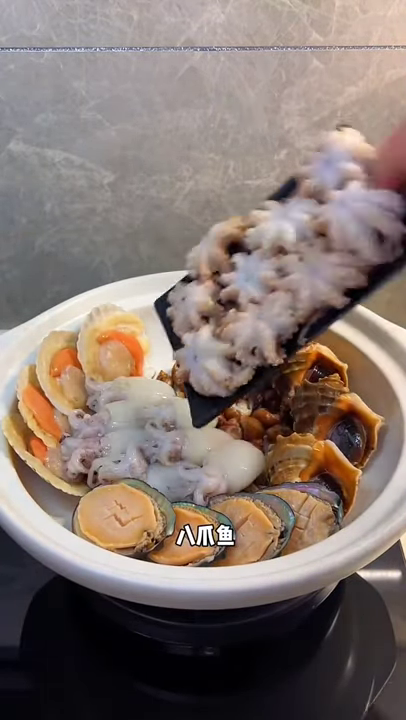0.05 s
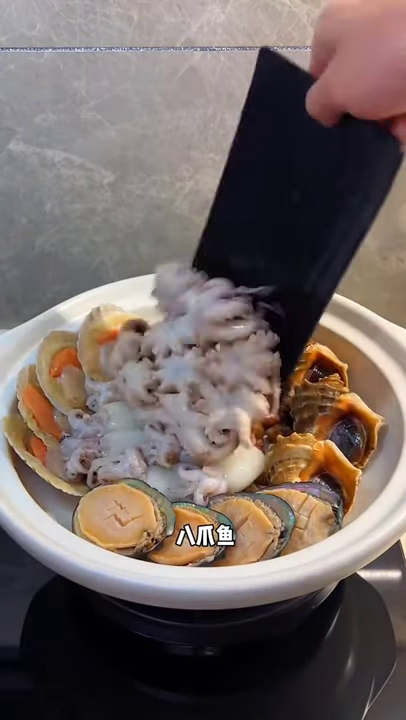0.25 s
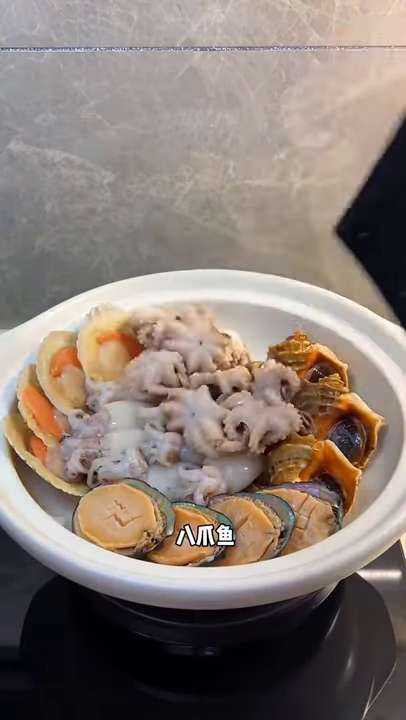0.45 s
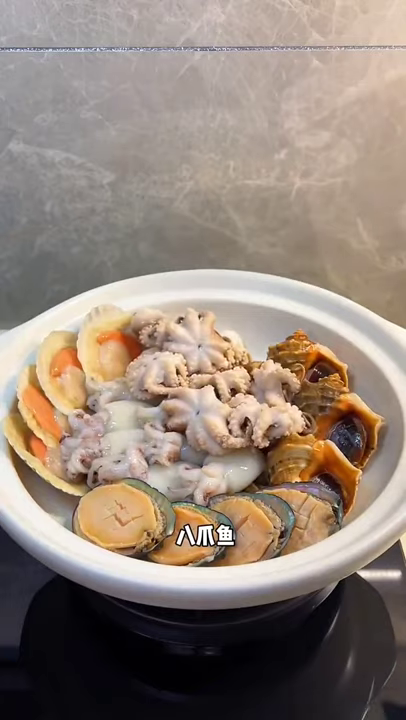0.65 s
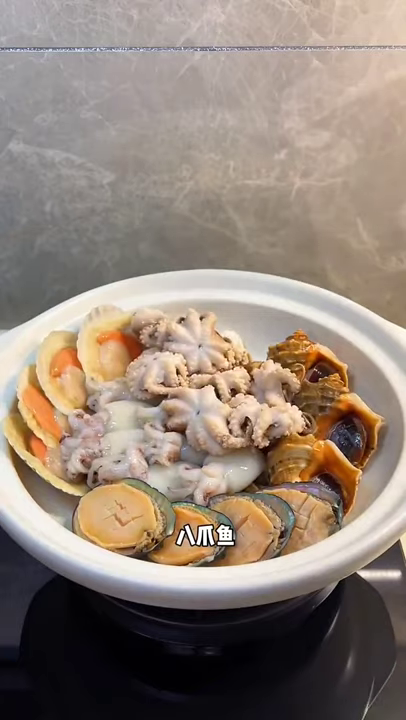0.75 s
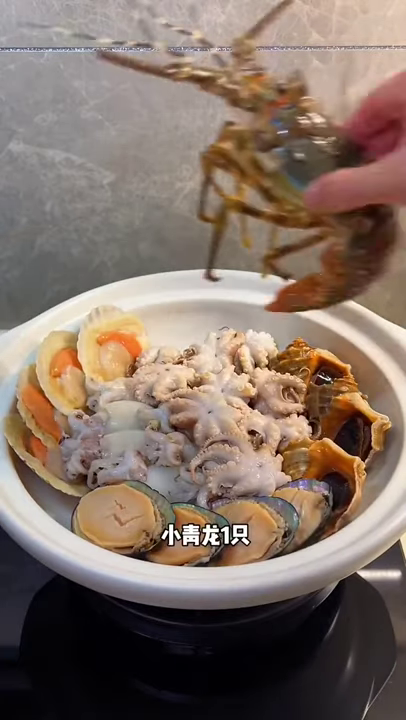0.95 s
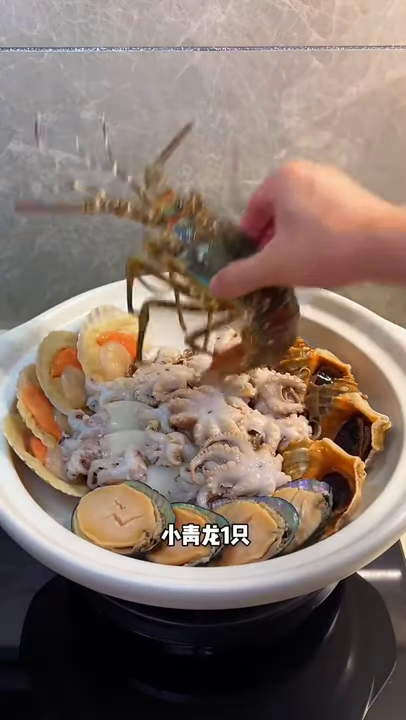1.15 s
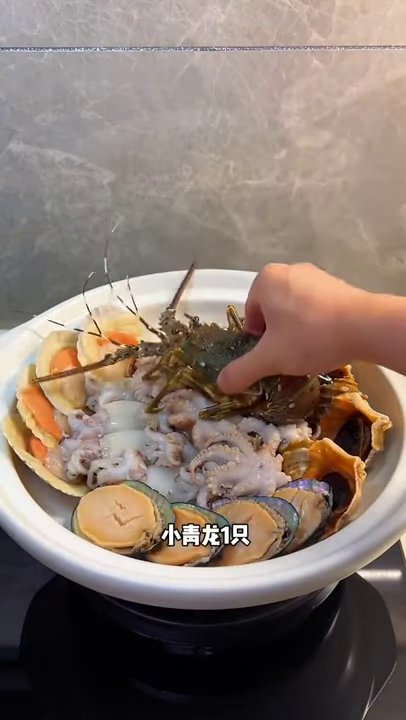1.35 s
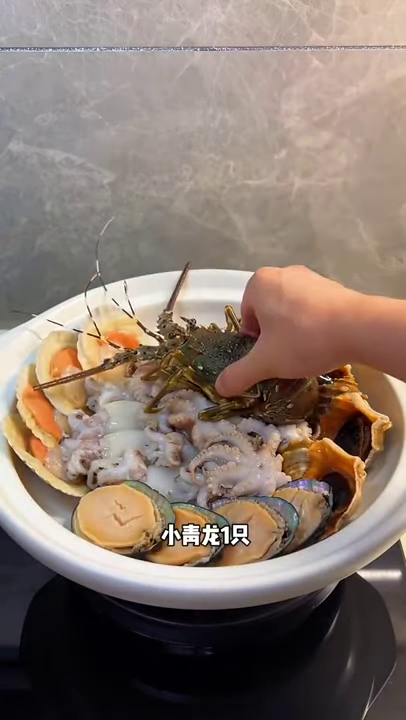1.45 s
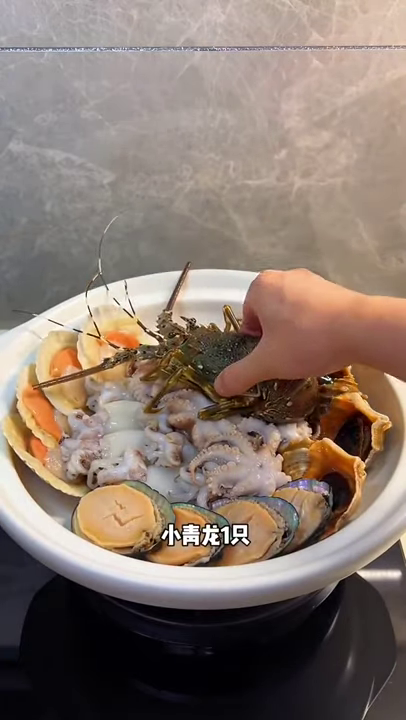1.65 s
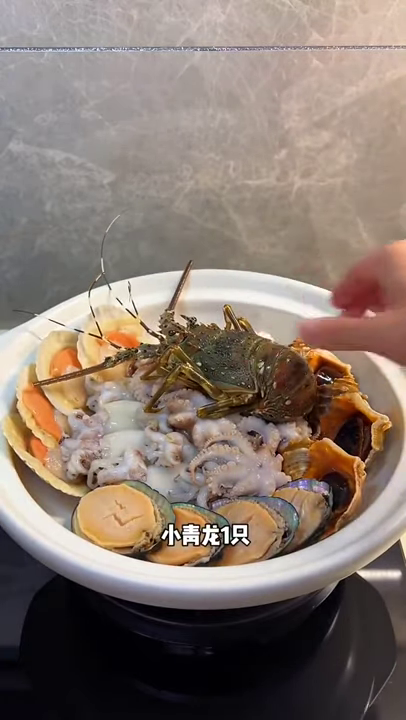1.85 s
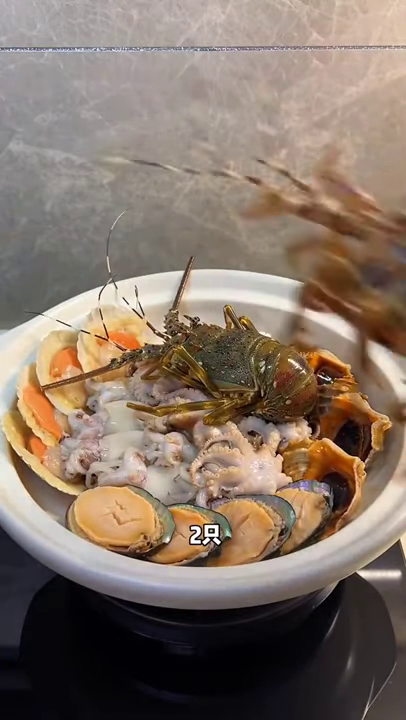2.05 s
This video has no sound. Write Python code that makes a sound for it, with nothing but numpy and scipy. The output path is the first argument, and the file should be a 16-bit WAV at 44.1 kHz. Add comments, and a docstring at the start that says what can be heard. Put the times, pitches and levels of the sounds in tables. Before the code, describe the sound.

Seafood clatters into a ceramic pot in a small kitchen. Octopus slithers in wetly from the start, while a plastic tray rattles on shells around 0.3 seconds and clips the rim with a sharp, brief ring just after. Following a pause, a lobster lands at 1.3 seconds with a crunchy thud, clinking a shell against the pot, then settles softly near 1.7 seconds. Faint hiss and low hum lie underneath.

```python
"""A wet slither comes first: octopus slides into a ceramic pot in a small, hard-walled kitchen. Its
plastic tray rattles on the shells and clips the rim; then a lobster is set down with a crunchy thud,
knocks a shell against the pot and settles. Impacts give bursts of contact noise and excite the damped
normal modes of pot, tray and hollow. Automatic gain control ducks the room's hiss after each loud hit."""
import sys
import numpy as np
from scipy import signal
from scipy.fft import rfft, irfft, next_fast_len
from scipy.io import wavfile
from scipy.ndimage import uniform_filter1d, minimum_filter1d, map_coordinates

SR = 44100
rng = np.random.default_rng(int(sys.argv[2]) if len(sys.argv) > 2 else 0)


def dump(signal):
    """Clip the signal to [-1, 1] and save it as 16-bit WAV at the path in sys.argv[1]."""
    limited = np.clip(np.atleast_2d(signal).T, -1, 1)
    pcm = np.round(limited * 32767).astype(np.int16)
    wavfile.write(sys.argv[1], SR, pcm)


N = 92610
T = np.arange(N) / SR
AGE = T[:SR * 3 // 4]  # time since an impact, t/s
CRACK_T60, RING_ROOM_DB = 0.035, -13.5  # shared by pot and tray


# Modes of the pot's wall: f/Hz, T60/s, level/dB struck on the rim, level/dB struck inside, beat f/Hz
POT_MODES = [(1031, 0.063, -2.5, -7, -4), (1294, 0.069, 0.5, -14, 0), (1410, 0.11, 0.5, -0.5, -17),
             (2505, 0.25, 2.5, -7.5, 10.5), (2607, 0.24, -8, 0, -16.5), (3344, 0.31, -8.5, -44, -5),
             (3970, 0.22, -13, -43, 0), (3882, .3, -7, -6, 8), (4048, 0.25, -5, -6.5, 8.5),
             (4890, 0.062, -28, -1.5, 0), (5022, 0.86, -31.5, -27, 0), (5443, 0.14, -33, -5, -3),
             (5490, 0.36, -36, -27, 5)]
# Spectrum of a hard contact: f/Hz, relative level/dB
CRACK_SPECTRUM = [(40, -35), (150, -8.5), (350, -11.5), (800, -11.5), (1350, 1.5), (2100, -8), (3700, -3),
                  (5000, -10), (8000, -18.5), (9200, -23.5), (10500, -23.5), (16000, -45)]
# Hits on the pot: t/s, ring level/dB, crack level/dB, place (0 rim, 1 inside), crack's reverb gain/dB
POT_HITS = [(.052, -48, -63, 0.27, -3), (0.3599, -1, 0.5, 0, 0), (1.304, -20, -37, 0.86, -6),
            (1.3277, -5, -3.5, 0.85, -7.5)]

def pot(rock_at_s=1.51, rock_db=-35):
    """Modal vibration: the place struck weights the ceramic's modes, and close twin modes beat."""
    out = np.zeros(N)
    for s, ring_db, crack_db, place, room_db in POT_HITS:
        modes = [(hz, rim + place * (wall - rim), t60, beat) for hz, t60, rim, wall, beat in POT_MODES]
        add(out, s, in_kitchen(amp(ring_db) * ring(modes), RING_ROOM_DB))
        add(out, s, in_kitchen(amp(crack_db) * burst(CRACK_SPECTRUM, CRACK_T60), room_db))
    # a shell rocks softly against the wall, favouring the modes near 1400 Hz
    muted = [(hz, wall - 6 * abs(np.log2(hz / 1400)), t60 * 0.78, beat)
             for hz, t60, _, wall, beat in POT_MODES]
    add(out, rock_at_s, amp(rock_db) * ring(muted))
    return out


# Modes of the plastic tray: f/Hz, level/dB at full force, T60/s
TRAY_MODES = [(1220, -25, 0.04), (1291, -2, .1), (1444, -0.5, 0.053), (1560, -1, 0.035),
              (2058, -12.5, 0.11), (2148, -5.5, 0.093), (3313, -9, 0.044), (3650, -6, 0.056),
              (5640, -3.5, 0.039), (5900, -13, 0.13), (7480, -13, 0.076)]
# Knocks on the shells: t/s, ring level/dB, crack level/dB
TRAY_KNOCKS = [(0.199, -29.5, -28.5), (0.206, -26.5, -33), (0.225, -18, -24), (.2548, -16, -40),
               (0.2752, -1.5, -7), (.279, -6, -1.5), (.283, -13.5, -5)]
# Spectrum of the tray's edge on the rim: f/Hz, relative level/dB
CHATTER_SPECTRUM = [(100, -41), (180, -2), (300, -34.5), (450, -11), (560, 1), (750, -23), (1300, -30),
                    (2150, -19), (2520, -1), (3050, -10.5), (3500, -7), (4050, 0), (4450, -2.5),
                    (5000, -32), (8500, -28.5), (15000, -36)]

def tray(chatter_at_s=0.36, rise_s=0.017, chatter_t60=0.27, chatter_db=-3, slips_per_s=1800):
    """Impact excitation: harder knocks ring brighter; then stick-slip chatters along the rim."""
    out = np.zeros(N)
    for s, ring_db, crack_db in TRAY_KNOCKS:
        db_per_octave = 0.28 * ring_db
        modes = [(hz, db + db_per_octave * np.log2(hz / TRAY_MODES[0][0]), t60, 0)
                 for hz, db, t60 in TRAY_MODES]
        add(out, s, in_kitchen(amp(ring_db) * ring(modes), RING_ROOM_DB))
        add(out, s, in_kitchen(amp(crack_db) * burst(CRACK_SPECTRUM, CRACK_T60), room_db=-5.5))
    swell = (1 - np.exp(-AGE / rise_s)) * amp(chatter_db - 60 * AGE / chatter_t60)
    add(out, chatter_at_s, grains(len(AGE), slips_per_s, CHATTER_SPECTRUM) * swell)
    return out


# Modes of the loaded pot's hollow: f/Hz, level/dB, T60/s
HOLLOW_MODES = [(448, -12, 0.132), (544, -12, 0.22), (623.3, -10.5, .22), (778.6, -12, 0.13)]
# Spectrum of a soft contact: f/Hz, relative level/dB
THUD_SPECTRUM = [(25, -47), (65, -10), (200, -12.5), (450, 0.5), (780, 4), (1100, -1.5), (2000, -7),
                 (3200, -7), (4800, -24), (15000, -39)]
# Soft, heavy landings: t/s, level/dB
LANDINGS = [(.276, -11.5), (.351, -23.5), (.36, -18), (.427, -21.5), (1.269, -25), (1.2845, -6.5),
            (1.297, -5), (1.3075, -14.5), (1.668, -43), (1.692, -37.5), (1.711, -28), (1.721, -32),
            (1.743, -38)]

def landings(push_at_s=1.285, push_s=0.079, push_hz=58, push_db=-30):
    """Cavity resonance: soft thuds ring the pot's hollow; the lobster's weight also rocks the counter."""
    out = np.zeros(N)
    hollow = [(hz, db, t60, 0) for hz, db, t60 in HOLLOW_MODES]
    for s, db in LANDINGS:
        thud = burst(THUD_SPECTRUM, t60=0.059) + ring(hollow)
        add(out, s, in_kitchen(amp(db) * thud, room_db=-10.5))
    push = amp(push_db) * arch(AGE / push_s)
    add(out, push_at_s, push * np.sin(2 * np.pi * push_hz * AGE))
    return out


# Legs and shells touching: t/s, level/dB
SHELL_TICKS = [(0.155, -37), (.211, -24.5), (1.2259, -26), (1.229, -28.5), (1.277, -26), (1.306, -16.5),
               (1.315, -34), (1.665, -40)]
# Shells scraping: start t/s, duration/s, level/dB
SHELL_SCRAPES = [(0.347, 0.039, -18), (1.285, 0.067, -25.5), (1.674, 0.11, -52.5)]
# Spectra of a tick and of a scrape: f/Hz, relative level/dB
TICK_SPECTRUM = [(100, -15), (500, -10.5), (1500, -14), (2400, -2.5), (3200, -1.5), (4200, -9.5),
                 (5300, -7), (7500, -15), (11000, -26.5), (16000, -28)]
SCRAPE_SPECTRUM = [(300, -27), (1200, 6), (3000, 5), (5400, -3), (7500, -3), (10500, -2), (13000, -14),
                   (16000, -18)]

def shells(grains_per_s=3000):
    """Damped impact and friction: legs and shells tick without ringing and scrape grittily."""
    ticks = np.zeros(N)
    for s, db in SHELL_TICKS:
        add(ticks, s, in_kitchen(amp(db) * burst(TICK_SPECTRUM, t60=0.053), room_db=1.5))
    strokes = sum(amp(db) * arch((T - s) / length) for s, length, db in SHELL_SCRAPES)
    return ticks + strokes * grains(N, grains_per_s, SCRAPE_SPECTRUM)


# Spectrum of wet smacks: f/Hz, relative level/dB
SMACK_SPECTRUM = [(80, -11), (500, -2), (900, 2.5), (1500, -20), (2200, 0), (3200, 0), (5500, -14),
                  (8000, -21), (15000, -22)]
# Envelope of the slide off the tray: t/s, level/dB
SLIDE_ENVELOPE = [(0, -57.5), (.08, -46.5), (.14, -46), (.19, -38.5), (.27, -31.5), (.34, -36), (.4, -36),
                  (.45, -75)]

def octopus(smacks_per_s=2500, pops_per_s=350, pop_hz=2800, log_spread=0.64, decay_cycles=9, pop_db=-1):
    """Bubble resonance: each pop is a damped sine, among the tiny wet smacks of sliding flesh."""
    smacks = grains(N, smacks_per_s, SMACK_SPECTRUM)
    pops, age = np.zeros(N), AGE[:SR // 50]
    for when, pitch, size in rng.random((int(pops_per_s * N / SR), 3)):
        hz = pop_hz * np.exp(log_spread * (2 * pitch - 1))
        bubble = np.sin(2 * np.pi * hz * age) * np.exp(-hz * age / decay_cycles)
        add(pops, when * N / SR, size ** 2 * bubble)
    return (smacks + amp(pop_db) * unit(pops)) * envelope(SLIDE_ENVELOPE)


# Reverberation time of the kitchen: f/Hz, T60/s
KITCHEN_T60 = [(100, 0.38), (500, 0.26), (1500, 0.31), (4000, 0.27), (8000, 0.29), (15000, 0.05)]

def in_kitchen(sound, room_db, wall_delay_s=0.001, build_s=0.002):
    """Reverberation: a diffuse tail follows the direct sound, its highest treble dying first."""
    hz, t, noise = signal.stft(rng.standard_normal(len(AGE)), SR, nperseg=256)
    decay = amp(-60 * t / along(KITCHEN_T60, hz)[:, None])
    tail = signal.istft(noise * decay, SR, nperseg=256)[1][:len(AGE)]
    tail *= np.clip((AGE - wall_delay_s) / build_s, 0, 1)
    return sound + amp(room_db) * signal.fftconvolve(sound, tail / np.linalg.norm(tail))[:len(sound)]


# Envelope of the hum: t/s, level/dB
HUM_ENVELOPE = [(0, -49.5), (.2, -55), (.42, -44.5), (.63, -49.5), (.7, -59), (1.25, -60), (1.39, -45.5),
                (1.55, -54), (2.1, -74)]
# Spectrum of the hiss: f/Hz, relative level/dB
HISS_SPECTRUM = [(20, 1), (45, -84.5), (70, -5.5), (100, -8.5), (190, -3), (320, -2.5), (600, -6.5),
                 (1200, -11.5), (3000, -12.5), (8000, -16.5), (16000, -24)]

def room_tone(hum_hz=65.7, drift_cycles=0.1, hiss_db=-44):
    """Ambient noise: steady hiss, and a low hum that wavers by random phase modulation."""
    wander = map_coordinates(rng.standard_normal(40), [T * 12], mode="mirror")
    hum = unit(np.sin(2 * np.pi * (hum_hz * T + drift_cycles * wander)))
    hiss = unit(coloured(rng.standard_normal(N), HISS_SPECTRUM))
    return amp(hiss_db) * hiss + hum * envelope(HUM_ENVELOPE)


def ring(modes):
    """Superposition of damped sines from rows of f/Hz, level/dB, T60/s, beat f/Hz."""
    return sum(amp(db - 60 * AGE / t60) * np.cos(np.pi * beat * AGE)
               * np.sin(2 * np.pi * (hz * AGE + rng.random())) for hz, db, t60, beat in modes)


def burst(spectrum, t60):
    """Contact noise with exponential decay."""
    return coloured(rng.standard_normal(len(AGE)) * amp(-60 * AGE / t60), spectrum)


def grains(samples, per_s, spectrum):
    """Shot noise: filtered random impulses, rms 1."""
    impulses = rng.standard_normal(samples) * (rng.random(samples) < per_s / SR)
    return unit(coloured(impulses, spectrum))


def coloured(x, spectrum, size=4096):
    """Minimum-phase filtering to a given spectrum, at unit power gain."""
    gain = unit(amp(along(spectrum, np.fft.rfftfreq(size, 1 / SR))))
    cepstrum = irfft(np.log(gain))
    cepstrum[1:size // 2] *= 2  # folding makes the filter causal
    cepstrum[size // 2 + 1:] = 0
    return signal.fftconvolve(x, irfft(np.exp(rfft(cepstrum))))[:len(x)]


def along(points, hz):
    """Interpolation on a log frequency axis."""
    f, values = np.transpose(points)
    return np.interp(np.log(hz + 1), np.log(f + 1), values)


def envelope(points):
    """Gain over time from rows of t/s, level/dB."""
    return amp(np.interp(T, *np.transpose(points)))


def arch(progress):
    """Half-sine pulse over 0 to 1."""
    return np.sin(np.pi * np.clip(progress, 0, 1))


def amp(db):
    """Decibels to gain."""
    return 10 ** (np.asarray(db) / 20)


def unit(x):
    """Normalisation to rms 1."""
    return x / np.sqrt(np.mean(x ** 2) + 1e-20)


def add(track, s, sound):
    """Mix a sound into the track at time s."""
    part = track[round(s * SR):][:len(sound)]
    part += sound[:len(part)]


def scene():
    """Superposition of all sources at one microphone above the pot."""
    return (pot() + tray() + landings() + shells() + octopus() + room_tone())[None]


# The level dips briefly: centre t/s, half duration/s, nominal depth/dB
LEVEL_DIPS = [(0.799, 0.0045, 13), (1.968, 0.013, 21)]

def record(dry, threshold_db=-12.5, squeeze=0.73, release_s=0.19, ceiling=0.98, edge_s=0.012, top_hz=16000):
    """Dynamic range compression, fast attack and slow release; then a limiter, two dips and a low-pass."""
    x = dry[0]
    level_db = 10 * np.log10(np.abs(uniform_filter1d(x ** 2, size=220)) + 1e-12)
    cut_db = squeeze * np.maximum(level_db - threshold_db, 0)
    release = np.exp(-T / release_s)
    held_db = np.maximum.accumulate(cut_db / release) * release
    x = x * amp(-uniform_filter1d(held_db, size=64))
    limiter_gain = np.minimum(1, ceiling / (np.abs(x) + 1e-9))
    x = x * uniform_filter1d(minimum_filter1d(limiter_gain, size=45), size=45)
    for s, half, depth_db in LEVEL_DIPS:
        dip = np.clip((half - np.abs(T - s)) / edge_s + 0.5, 0, 1)
        x = x * amp(-depth_db * dip)
    padded = next_fast_len(N + SR // 2)
    passband = np.fft.rfftfreq(padded, 1 / SR) < top_hz
    return irfft(rfft(x, padded) * passband, padded)[None, :N]


dry = scene()
out = record(dry)
dump(out)
```